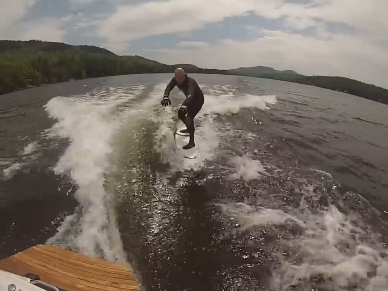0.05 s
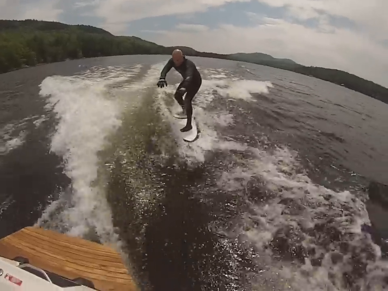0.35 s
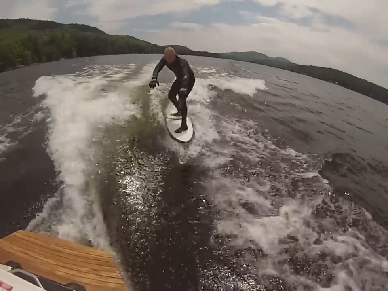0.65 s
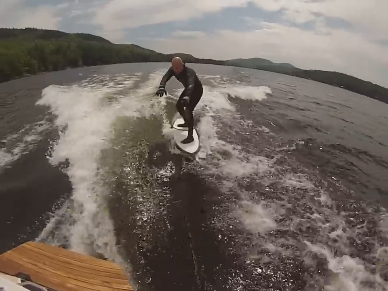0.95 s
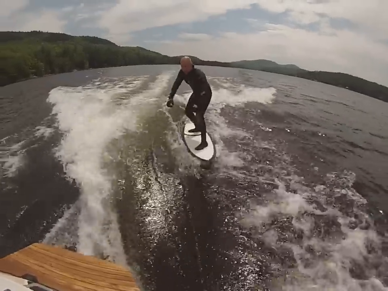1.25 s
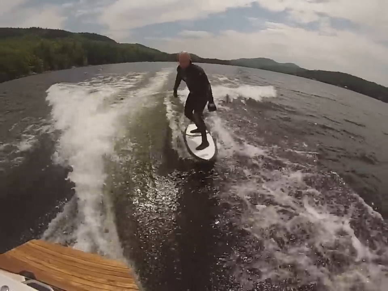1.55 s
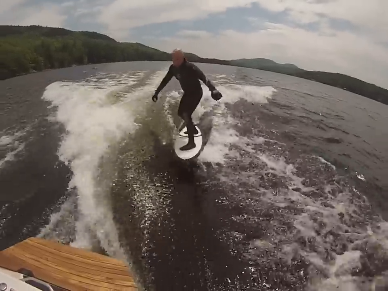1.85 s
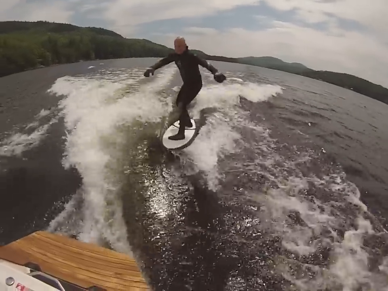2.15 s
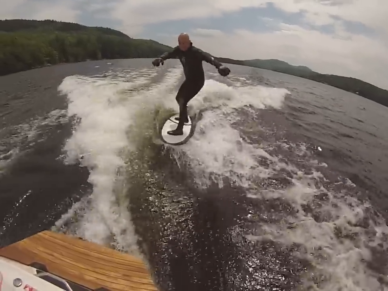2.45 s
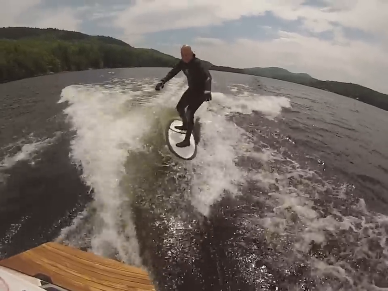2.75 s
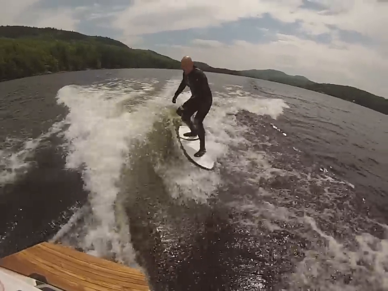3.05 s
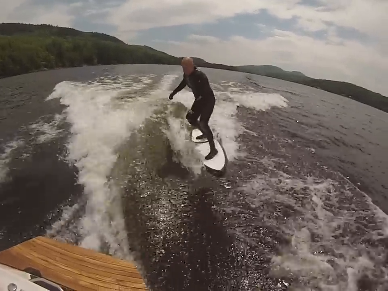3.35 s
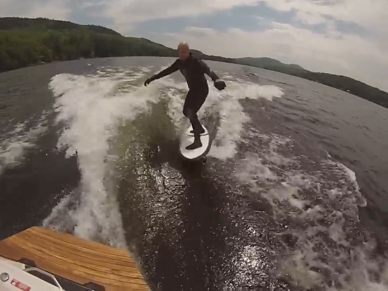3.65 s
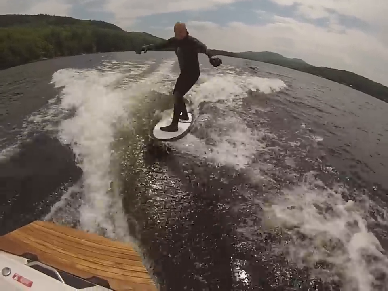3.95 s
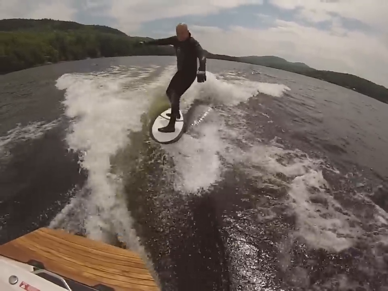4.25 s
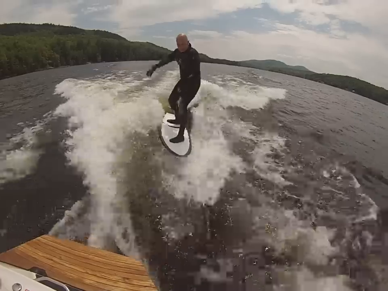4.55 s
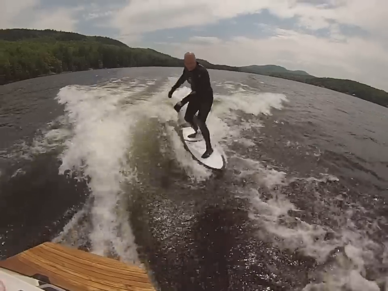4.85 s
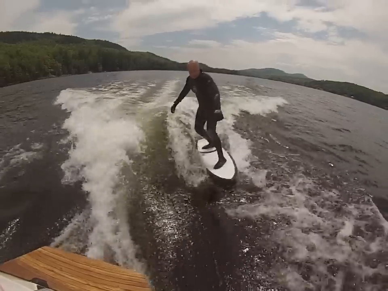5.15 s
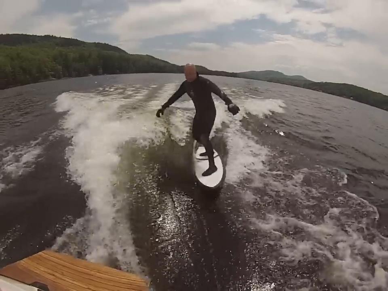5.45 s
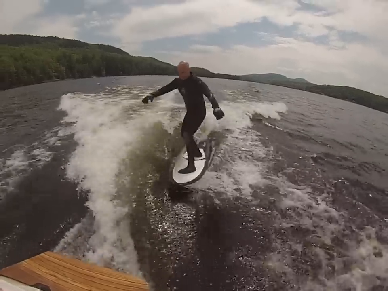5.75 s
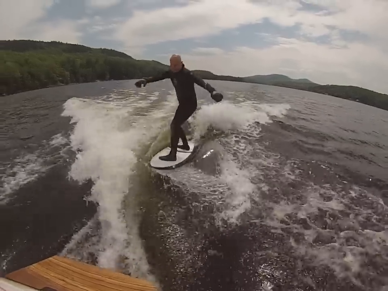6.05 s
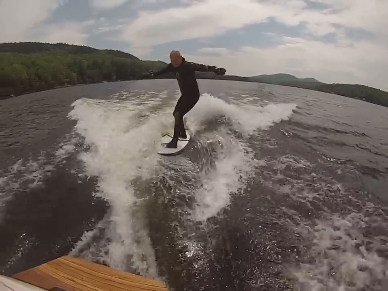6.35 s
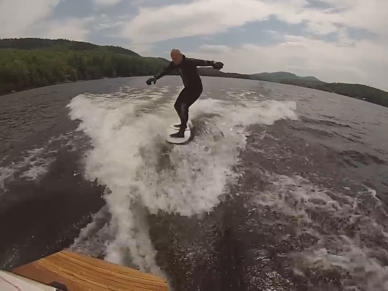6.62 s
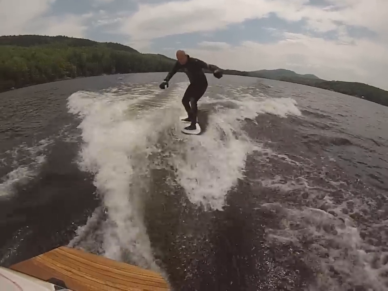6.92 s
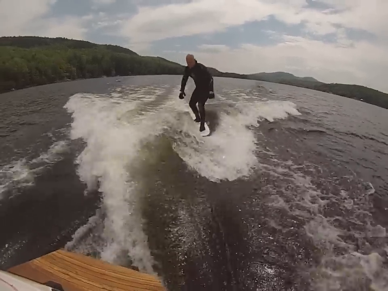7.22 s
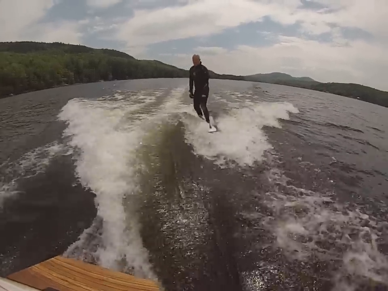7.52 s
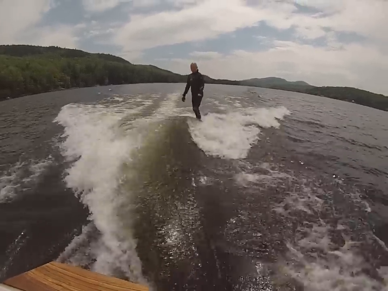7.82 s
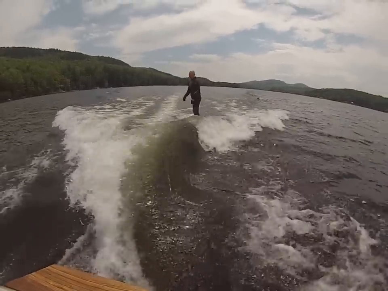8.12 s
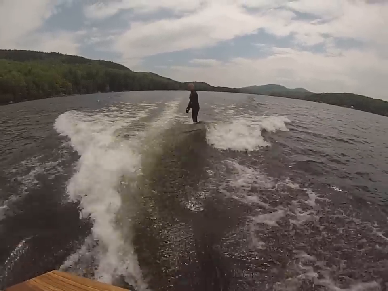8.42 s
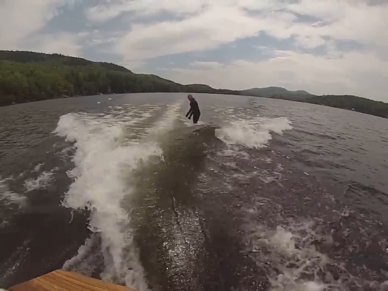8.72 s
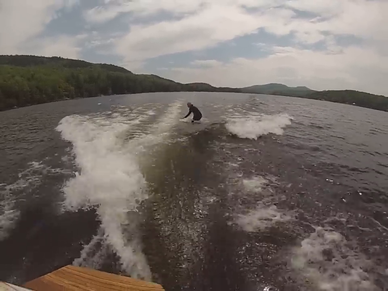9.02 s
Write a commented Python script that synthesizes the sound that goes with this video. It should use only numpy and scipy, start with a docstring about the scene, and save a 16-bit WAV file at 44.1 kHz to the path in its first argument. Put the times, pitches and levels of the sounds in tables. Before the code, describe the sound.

From the start, a motorboat engine drones at a held speed, deep and pulsing, with only a slight waver in pitch and loudness. It is heard from the stern, in the open air on a lake. Around it the wake runs without a break: a heavy low churn, a bubbling wash and a fine hiss of spray. Short, low gulps of exhaust gas come up through the water, the clearest at about 0.8, 2.5 and 7.8 seconds. A very faint sizzle of foam passes near 1.8 seconds. From about 6.2 to 7 seconds a surfer's board throws a soft splash that swells and fades within the wash. At about 8.5 seconds the throttle is pulled back. The engine drops around an octave in half a second and becomes a quieter, uneven burble, while the water keeps rushing until the end, just after 9 seconds.

```python
"""On a lake, at the stern of a wake boat with a surfer riding behind it.
The V8 engine drones at a held speed as its firings pulse through a wet exhaust pipe, and pockets
of gas gulp out under the stern. Countless bubbles make the wake churn, wash and hiss; a patch
of foam sizzles, and later the surfer's hard turn throws a splash. Near the end the throttle
is pulled back and the engine sinks to an uneven burble."""
import sys
import numpy as np
from scipy import signal
from scipy.fft import rfft, irfft, next_fast_len
from scipy.io import wavfile

SR = 44100
rng = np.random.default_rng(int(sys.argv[2]) if len(sys.argv) > 2 else 0)


def to_wav(sig):
    """Store sig (one row per channel, or 1-D mono) as 16-bit WAV at the path in sys.argv[1].

    Samples outside -1..1 are clipped; the rate is SR.
    """
    pcm = np.clip(np.atleast_2d(sig), -1, 1) * 32767
    pcm = np.round(pcm).astype(np.int16)
    wavfile.write(sys.argv[1], SR, pcm.T)  # frames by channels


N = 404838

# The speed control hunts around its setting as the hull's drag changes: time_s, cycles_per_s
ENGINE_SPEED = [(0.0, 17.35), (0.52, 17.77), (0.72, 17.37), (1.2, 17.77), (1.68, 17.03), (2.2, 17.61),
                (2.8, 17.36), (3.12, 17.54), (4.08, 17.49), (4.64, 17.02), (5.0, 17.56), (5.52, 17.19),
                (5.72, 17.45), (7.0, 17.35), (7.32, 17.67), (7.76, 16.73), (8.16, 17.56), (8.44, 17.61)]
# The firing tone swells and sinks as the stern rides the water: time_s, peak_level_db
FIRING_LEVEL = [(0.0, -7.9), (0.8, -8.0), (1.04, -10.6), (1.6, -7.5), (3.24, -8.9), (3.96, -7.2),
                (4.12, -8.7), (4.56, -6.7), (5.08, -9.2), (5.28, -6.7), (5.76, -8.2), (6.04, -7.2),
                (6.2, -9.3), (6.6, -7.7), (7.2, -9.0), (7.76, -7.3), (8.04, -9.2), (8.44, -7.5)]
# Exhaust tones under load. Pitch is order times engine speed, and level is compared with
# the firing tone (order 8): order, level_db
EXHAUST_TONES = [(2, -35.5), (3, -29), (4, -30), (5, -10.5), (6, -17), (7, -30), (8, 0), (9, -21.5),
                 (10, -17.5), (11, -23.5), (12, -33), (13, -25.5), (14, -34.5), (15, -39), (16, -20.5),
                 (17, -30.5), (18, -23.5), (19, -31), (20, -34.5), (21, -38), (23, -35), (24, -43),
                 (25, -45.5), (26, -46.5), (27, -43), (29, -39.5)]
# What the exhaust pipe lets through: pitch_hz, gain_db
PIPE_RESPONSE = [(20, -33.5), (48, -29), (62, -15.5), (75, -5.5), (88, -2), (112, 7), (145, 0.5), (180, -3),
                 (210, -14), (250, -13.5), (300, -10), (360, -22.5), (500, -21), (900, -37.5)]
# One exhaust tone, near 310 Hz, wavers more than the rest: time_s, gain_db
WAVERING_GAIN = [(0.0, -2.5), (1.32, -1), (1.52, 5), (4.92, -0.5), (5.32, 0.5), (5.72, -9), (6.16, 3),
                 (6.68, -2), (6.84, 1.8), (7.76, -2.5), (7.92, -3), (8.44, 3.5)]
# The wake surges and eases, in all its layers at once: time_s, gain_db
WAKE_SURGE = [(0.0, 0.5), (0.76, 0.1), (0.96, -0.9), (1.28, 1.0), (3.24, 0.1), (3.52, -0.8), (3.84, 1),
              (4.36, 0.6), (5.6, -1.1), (5.84, 0.0), (7.32, -0.6), (8.36, 0.4), (8.76, -1.2), (9.16, 0.5)]
# Heavy water thrown up behind the stern: pitch_hz, gain_db
CHURN_SPECTRUM = [(25, -8), (60, -2), (200, -0.5), (350, -2), (430, -1.5), (570, -2.5), (720, 1),
                  (900, -1.5), (1120, -4), (1400, -13.5), (1900, -25)]
# The wash of the breaking crest: pitch_hz, gain_db
WASH_SPECTRUM = [(900, -17.5), (1400, -5), (1700, 1), (1950, 0.5), (2350, -4), (2800, -8.5), (3250, -4.5),
                 (3600, -5.5), (4200, -10.5), (4800, -16), (6000, -36.5)]
# Spray and bursting foam: pitch_hz, gain_db
SPRAY_SPECTRUM = [(4000, -15.5), (4900, -6), (5270, 0.5), (5800, -4.5), (6250, 0.5), (7200, -4),
                  (7900, -7.5), (8900, -8), (9900, -13), (11900, -10), (13000, -12.5), (14200, -16.5),
                  (15500, -19.5)]
# Gulps of gas breaking out under the stern: middle_s, level_db, half_length_s
GAS_GULPS = [(0.399, -28, .04), (.81, -17, .05), (2.501, -19.5, 0.059), (4.221, -26, .04),
             (6.01, -24, 0.036), (7.77, -21, 0.049)]
# The finest foam: pitch_hz, gain_db
FOAM_SPECTRUM = [(9000, -12), (12000, 0), (15000, -9)]
# The board's splash, faint until the surfer's hard turn: time_s, level_db
SPLASH_LEVEL = [(0, -69.5), (6.1, -59.5), (6.25, -41), (6.42, -34), (6.65, -39.5), (6.9, -42), (7.1, -70)]
# The sheet of water thrown by the board: pitch_hz, gain_db
SPLASH_SPECTRUM = [(500, -14), (680, 1.5), (850, 1.5), (1200, -12), (2200, -15.5), (5000, -18.5),
                   (7000, -25), (12000, -44)]

CYLINDERS = 8   # each fires once per engine cycle
WAVERING_ORDER, FLUTTERING_ORDERS = 18, (5, 17)
THROTTLE_OFF_S, RUN_DOWN_S, IDLE_CYCLES_PER_S = 8.475, .29, 8.6
# The pulses go soft while the engine coasts, until the idle control catches it.
COAST_SOFTER_DB, CAUGHT_S, CATCH_LENGTH_S = 23, 8.87, .07
CHURN_DB, WASH_DB, SPRAY_DB = -29.1, -38.5, -49.5


def from_db(db):
    """Turn decibels into a number to multiply by."""
    return 10 ** (np.asarray(db) / 20)


def rms_one(x):
    """Scale a signal to an average strength (rms) of 1."""
    return x / np.sqrt(np.mean(x ** 2) + 1e-20)


def in_time(rows):
    """Join a table's points with straight lines, giving a value at every sample."""
    time_s, values = np.transpose(rows)
    return np.interp(np.arange(N) / SR, time_s, values)


def at_hz(spectrum, hz):
    """Read a spectrum's decibels at any pitch, spacing the octaves evenly."""
    pitch_hz, gain_db = np.transpose(spectrum)
    return np.interp(np.log(np.maximum(hz, 1)), np.log(pitch_hz), gain_db)


def coloured(x, spectrum):
    """Filter a signal by a spectrum that falls away beyond its ends; rms 1."""
    size = next_fast_len(N + SR // 2)
    hz = np.arange(size // 2 + 1) * SR / size + 1
    ends = np.minimum(1, np.minimum(hz / spectrum[0][0], spectrum[-1][0] / hz)) ** 2
    shaped = rfft(x, size) * from_db(at_hz(spectrum, hz)) * ends
    return rms_one(irfft(shaped, size)[:N])


def drift(rate_hz):
    """A slow random wander, about 1 in size."""
    r = np.exp(-200 * np.pi * rate_hz / SR)
    noise = rng.standard_normal(N // 100 + 1002)   # one value per 100 samples
    slow = signal.lfilter([1], [1, -2 * r, r * r], noise)[1000:]
    return np.interp(np.arange(N) / 100, np.arange(len(slow)), rms_one(slow))


def swell(middle_s, half_length_s):
    """A bell-shaped rise and fall of height 1."""
    return np.exp(-.5 * ((np.arange(N) / SR - middle_s) / half_length_s) ** 2)


def run_down():
    """How far the engine has slowed, from 0 at the held speed to 1 at idle."""
    since_s = np.maximum(np.arange(N) / SR - THROTTLE_OFF_S, 0)
    return 1 - np.exp(-(since_s / RUN_DOWN_S) ** 1.55)   # the power rounds the start of the fall


def start_phases(stagger=.56):
    """Where in its wave each exhaust tone starts, which shapes the engine's pulses."""
    start = rng.uniform(0, 2 * np.pi, round(EXHAUST_TONES[-1][0]) + 1)
    for k in FLUTTERING_ORDERS:   # their neighbours make these flutter in pitch rather than throb
        start[k - 1] = 2 * start[k] - start[k + 1] + np.pi
    # Tones pair up around the firing tone: the banks differ in timing (stagger 1) or strength (0).
    start[CYLINDERS + 1:2 * CYLINDERS] = np.pi * stagger - start[CYLINDERS - 1:0:-1]
    return start


def exhaust_drone(speed, cycles, idling):
    """Two unequal banks of cylinders make tones at multiples of the engine speed; the pipe shapes them."""
    cruise = np.median(speed)
    pipe_db = at_hz(PIPE_RESPONSE, CYLINDERS * speed) - at_hz(PIPE_RESPONSE, CYLINDERS * cruise)
    firing_db = in_time(FIRING_LEVEL) + .52 * pipe_db - 5.5 * idling
    ripple_db = .3 * drift(6)   # ripples over the outlet
    out = from_db(firing_db + ripple_db) * np.sin(2 * np.pi * CYLINDERS * cycles)
    # A slow firing tone is too low for the pipe, so the other tones stand out more.
    lift_db = np.minimum(-pipe_db, 11)
    coasting = idling * np.clip((CAUGHT_S - np.arange(N) / SR) / CATCH_LENGTH_S, 0, 1)
    covered_db = .2 * drift(2.5)   # water washes over the outlet
    start = start_phases()
    for order, level_db in EXHAUST_TONES:
        k = round(order)
        tone_db = firing_db + lift_db + level_db
        tone_db += at_hz(PIPE_RESPONSE, k * speed) - at_hz(PIPE_RESPONSE, k * cruise)
        # Soft pulses lack high tones.
        tone_db -= COAST_SOFTER_DB * coasting * np.clip(k / CYLINDERS - 1, 0, 1)
        unsteady = np.clip(-level_db / 25, 0, 1)   # weak tones are the least steady
        waver_db = unsteady * (covered_db + 1.5 * drift(2.86))
        if k == WAVERING_ORDER:
            waver_db = in_time(WAVERING_GAIN) * (1 - idling)
        phase = 2 * np.pi * k * cycles + start[k] + .35 * unsteady * drift(4)
        if k != CYLINDERS:   # the firing tone is already in
            out += from_db(tone_db + waver_db) * np.sin(phase)
    return out


def exhaust_burble(cycles, idling, level_db=-27, idle_rise_db=7):
    """Each firing is a little too strong or too weak, and the odd puffs boom in the pipe."""
    fired = np.flatnonzero(np.diff(np.floor(cycles * CYLINDERS))) + 1
    puffs = np.zeros(N)
    puffs[fired] = rng.choice([-1, 1], len(fired)) * rng.uniform(.39, 1, len(fired))
    brighter_pipe = [(hz, db + np.log2(hz)) for hz, db in PIPE_RESPONSE]   # 1 dB more per octave
    return from_db(level_db + idle_rise_db * idling) * coloured(puffs, brighter_pipe)


def bubbles(low_hz, high_hz, per_s, spread_db, ring_cycles, pitches=16):
    """Bubbles of random size burst in clumps, each ringing briefly; rms 1."""
    out = np.zeros(N)
    bursts = np.flatnonzero(rng.random(N) < per_s * from_db(3 * drift(8)) / SR)
    size_draw, sign_draw, pitch_draw = rng.random((len(bursts), 3)).T
    sizes = from_db(spread_db * np.minimum(-np.log(1 - size_draw), 4)) * np.sign(sign_draw - .5)
    for k, hz in enumerate(np.geomspace(low_hz, high_hz, pitches)):
        clicks = np.bincount(bursts, sizes * (np.floor(pitch_draw * pitches) == k), N)
        decay = from_db(-60 * hz / (ring_cycles * SR))   # fades 60 dB over ring_cycles
        ringing = [1, -2 * decay * np.cos(2 * np.pi * hz / SR), decay * decay]
        out += hz * signal.lfilter([1, 0, -1], ringing, clicks + 1e-18)
    return rms_one(out)


def water(spectrum, near_bubbles, near_db, flutter_db):
    """A rush of countless small bubbles with nearer ones standing out; rms about 1."""
    rush = rng.standard_normal(N) + from_db(near_db) * near_bubbles
    return coloured(rush, spectrum) * from_db(flutter_db * drift(21))


def wake(cycles, idling):
    """Churned water, the breaking crest and its spray: the smaller the bubbles, the higher they ring."""
    large = bubbles(303, 1600, per_s=1500, spread_db=1.8, ring_cycles=20.3)
    churn = water(CHURN_SPECTRUM, large, near_db=-12, flutter_db=-.02)
    medium = bubbles(1297, 5170, per_s=2500, spread_db=2.5, ring_cycles=14)
    wash = from_db(WASH_DB) * water(WASH_SPECTRUM, medium, near_db=-9.5, flutter_db=.3)
    small = bubbles(4500, 14000, per_s=3000, spread_db=3, ring_cycles=8)
    spray = water(SPRAY_SPECTRUM, small, near_db=-9, flutter_db=.42)
    churn *= from_db(CHURN_DB - 1.4 * idling)   # an idling propeller churns less
    churn *= 1 + .05 * np.sin(2 * np.pi * CYLINDERS * cycles)   # the exhaust throbs faintly in it
    spray *= from_db(SPRAY_DB + 1.5 * idling)   # the wake fizzes more as it catches up with the stern
    surge_db = in_time(WAKE_SURGE)
    return from_db(surge_db) * (wash + spray) + from_db(.85 * surge_db) * churn


def gas_gulps(pitch_hz=92, wobble=.1):
    """Large pockets of exhaust gas wobble briefly in the water."""
    level = sum(from_db(db) * swell(middle_s, half_s) for middle_s, db, half_s in GAS_GULPS)
    phase = 2 * np.pi * np.cumsum(pitch_hz * (1 + wobble * drift(15))) / SR
    return np.sqrt(2) * level * np.sin(phase)


def foam_sizzle(level_db=-61):
    """A patch of the finest bubbles bursts and is gone."""
    tiny = bubbles(9000, 14000, per_s=3000, spread_db=2.5, ring_cycles=8, pitches=6)
    fizz = water(FOAM_SPECTRUM, tiny, near_db=-8, flutter_db=.4)
    return from_db(level_db) * swell(middle_s=1.82, half_length_s=.12) * fizz


def board_splash():
    """The surfboard cuts into the wave and throws a fan of drops."""
    drops = bubbles(600, 7000, per_s=1500, spread_db=.5, ring_cycles=12)
    return from_db(in_time(SPLASH_LEVEL)) * water(SPLASH_SPECTRUM, drops, near_db=-5.5, flutter_db=1.1)


def scene():
    """Engine, wake and surfer in the open air, in one channel."""
    idling = run_down()
    speed = in_time(ENGINE_SPEED) * (1 - idling) + IDLE_CYCLES_PER_S * idling
    cycles = np.cumsum(speed) / SR   # engine cycles so far
    exhaust = exhaust_drone(speed, cycles, idling) + exhaust_burble(cycles, idling) + gas_gulps()
    return (exhaust + wake(cycles, idling) + foam_sizzle() + board_splash())[None]


def record(dry):
    """Cut the treble steeply above 15300 Hz."""
    return signal.sosfilt(signal.ellip(12, .1, 90, 15300, fs=SR, output="sos"), dry)


dry = scene()
out = record(dry)
to_wav(out)
```